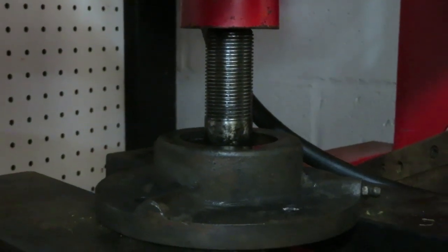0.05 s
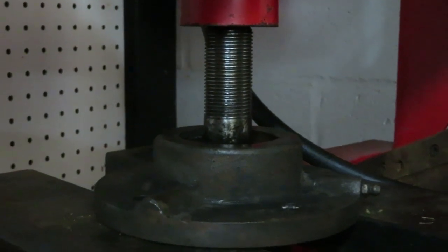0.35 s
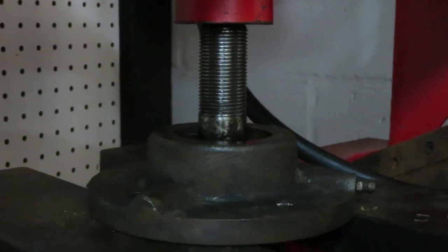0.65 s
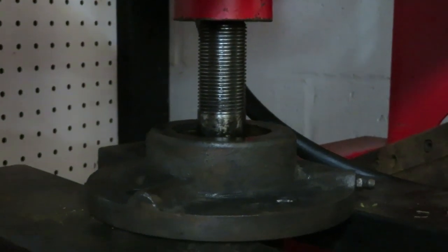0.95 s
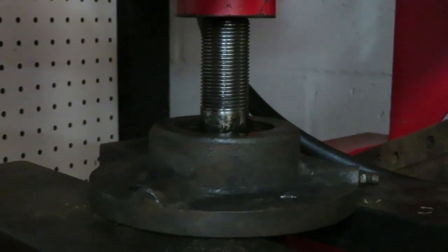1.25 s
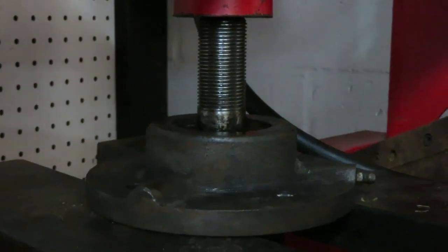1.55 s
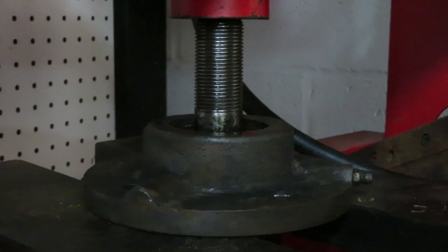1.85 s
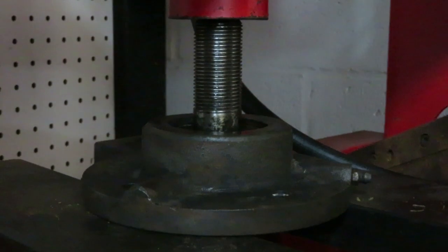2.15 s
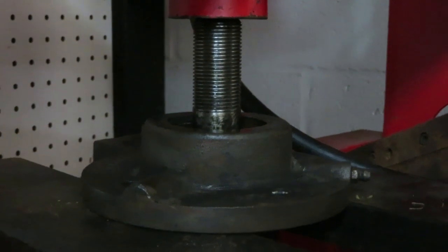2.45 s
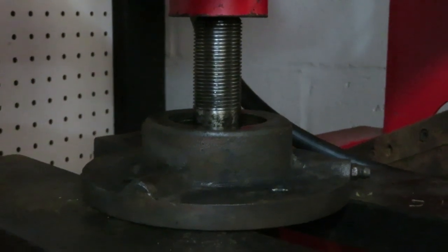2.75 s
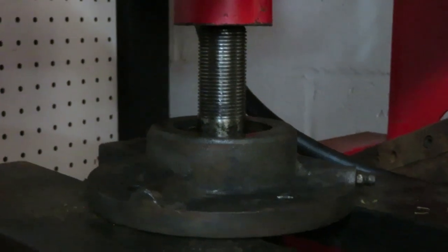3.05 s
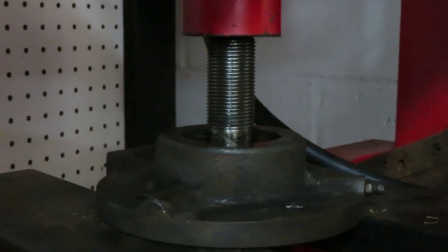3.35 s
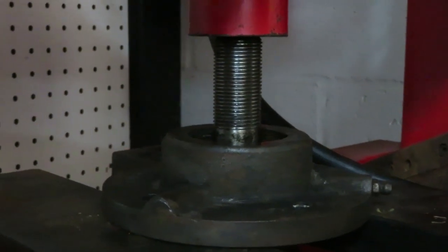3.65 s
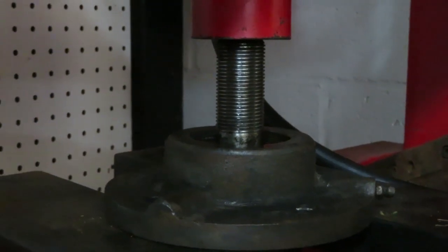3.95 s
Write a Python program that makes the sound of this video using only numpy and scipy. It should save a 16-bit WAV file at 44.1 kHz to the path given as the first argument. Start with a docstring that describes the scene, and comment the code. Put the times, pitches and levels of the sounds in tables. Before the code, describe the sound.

In a garage workshop, the air-powered pump of a hydraulic press sputters twice, stops for a moment, then runs in a fast, even chatter of hissing puffs and piston knocks, with a short room echo.

```python
"""An air-driven hydraulic pump works a shop press, twelve strokes a second, with one short pause. Each stroke
dumps a sharp puff of air through the muffler, followed by a brief second breath of air; the piston then knocks
against its stop, the check valve seats a moment later, and air hisses in for the next stroke. Heard on two
microphones in a garage: the bench close by gives quick reflections, the room a longer tail, and faint room air
lies underneath."""
import sys
import numpy as np
from scipy import signal
from scipy.fft import rfft, irfft
from scipy.io import wavfile
from scipy.ndimage import uniform_filter1d

SR = 44100
rng = np.random.default_rng(int(sys.argv[2]) if len(sys.argv) > 2 else 0)


def wav_out(sig):
    """Save sig, one row per channel (or a flat mono array), as 16-bit PCM at SR to the path in sys.argv[1]."""
    wavfile.write(sys.argv[1], SR, np.round(np.clip(np.atleast_2d(sig).T, -1, 1) * 32767).astype(np.int16))


N = 176400
T = np.arange(N) / SR
HZ = np.maximum(np.arange(N // 2 + 1) * SR / N, 1)

# pump strokes: t/s, puff/dB, extra treble (0.85 dB a unit), knock/dB, valve seating/dB
STROKES = [(0.025, -17.5, -1.0, -3, -13), (0.1236, -21, -3.3, -9.5, -27), (0.5799, -18.5, -0.5, -4, -9),
           (0.6621, -18.5, 0.5, -7.5, -7), (0.7445, -20.5, 2.3, -3, -14), (0.8274, -19, -1.4, -10, -17),
           (0.9088, -18, -3.2, -6.5, -12), (0.9907, -19.6, 0.4, -5, -22), (1.0726, -19.5, -0.8, -2, -11),
           (1.1542, -20.5, 1.0, -0.5, -2), (1.2366, -20.0, 0.5, -4.5, -14.5), (1.32, -22.5, 2.5, -5, -19),
           (1.407, -21.5, 0, -13, -9), (1.4988, -22, 2.3, -3, -17), (1.5844, -20.5, 1.2, -6, -5),
           (1.6672, -21, 1.8, -2.5, -11), (1.7502, -20.5, -0.6, -4, -18), (1.8329, -20, 0.7, -2, -8),
           (1.9157, -20.5, -0.3, -0.5, -8), (1.9994, -19.5, -0.5, -7, -17.5), (2.0829, -20.5, 0.5, -4, -19),
           (2.1658, -19, -0.5, -5.5, -16), (2.2494, -20.2, 0.8, -2, -11), (2.3339, -20, -0.3, -14, -11),
           (2.4186, -21.5, 1.5, -8.5, -11), (2.5022, -21, 1, -11, -22), (2.5865, -20.0, 1.6, -11, -17),
           (2.6697, -19, -0.5, -7.5, -16), (2.753, -21, 1.5, -6, -17), (2.837, -21, 1.5, -9, -14),
           (2.9199, -19.5, -1.5, -11, -17), (3.0039, -22, 1.3, -1, -6), (3.0868, -21, 1, -12, -18),
           (3.1711, -21, -1, -2, -13), (3.254, -21, 1.1, -2, 1), (3.3381, -22, 0.7, -2, -9),
           (3.421, -21, -1.5, -1, -2.5), (3.5059, -20.5, -3.7, -12, -14), (3.5889, -19.5, -2.5, -2, -1),
           (3.6727, -21, -0.0, -17, -20), (3.7553, -20, -1.8, -1.5, -4), (3.8387, -19, -3, -17, -13),
           (3.9209, -19, 0, -7, -8)]


def exhaust():
    """The valve snaps open and the cylinder empties through the muffler: a burst, then a slower drain."""
    # exhaust jet spectrum: f/Hz, level/dB
    jet_colour = [(100, -28.5), (300, -20), (700, -13), (1200, -9), (2000, -6.5), (2800, 0), (3600, -0.5),
                  (4500, -1), (5600, -4.5), (9000, -4.5), (11500, -8.5), (14500, -21), (16000, -28)]
    # muffler resonances: f/Hz, width/Hz, boost/dB
    muffler = [(1610, 136, 6), (1890, 140, 5), (2320, 37, 10), (2880, 150, 1.5), (3315, 42, 5),
               (3600, 170, 6.5), (8830, 180, 2.5)]
    attack_s, hold_s, fall_db_per_s = 0.0041, 0.0013, 1504.5
    drain_db, drain_db_per_s, drain_s = -9.5, 503, .03
    puff_db, rough_db, treble_hz = 2.5, 1.5, 5500
    jet = noise(jet_colour, muffler)
    turbulence = rms_one(uniform_filter1d(rng.standard_normal(N), size=24))
    jet *= from_db(rough_db * turbulence)
    treble = irfft(rfft(jet) / (1 + (treble_hz / HZ) ** 4), N)
    out = np.zeros(N)
    for start, db, extra_treble, _, _ in STROKES:
        span = slice(int(start * SR), int((start + .1) * SR))
        age = np.maximum(T[span] - start, 0)
        falling_s = np.maximum(age - attack_s - hold_s, 0)
        burst = from_db(-fall_db_per_s * falling_s)
        drain = from_db(drain_db - drain_db_per_s * falling_s) / (1 + (age / drain_s) ** 10)
        flow = np.minimum(age / attack_s, 1) ** 0.65 * np.hypot(burst, drain)
        bright = from_db(0.85 * extra_treble) - 1
        out[span] += from_db(db + puff_db) * flow * (jet[span] + bright * treble[span])
    return out


def thump():
    """The volume of each puff reaches the microphones as one push of pressure."""
    level_db, rise_s, hold_s, fall_s = -27.5, 0.0028, 0.0063, 0.0076
    corners = np.cumsum([0, rise_s, hold_s, fall_s])
    mean_puff_db = np.mean(np.array(STROKES)[:, 1])
    return sum(from_db(level_db + db - mean_puff_db) * np.interp(T, start + corners, [0, 1, 1, 0])
               for start, db, *_ in STROKES)


def piston():
    """The piston hits its stop and the check valve seats just after, ringing the pump body a little differently
    each time."""
    # pump body modes: f/Hz, level on the knock/dB, level on the valve seating/dB, t60/s
    body = [(132, -35, -28, 0.25), (171, -12, -19, 0.094), (236, -0.5, 0, 0.0074), (417, -12.5, -11, .05),
            (460, 5.5, -20, 0.01), (690, 9, -9, 0.0075), (1176, 1, 2.5, 0.031), (1370, -2.5, 2.5, 0.031),
            (1846, -6.5, -2.5, .03), (2170, -2.5, -18, 0.037), (4880, -2.5, -10.5, 0.023),
            (9720, -11, -16, 0.048), (13760, -18.5, -20, .05)]
    knock_delay_s, seat_delay_s, jitter_s = .0262, .032, .0007
    level_db, spread_db = -32, 1.5
    starts, _, _, knock_db, seat_db = np.transpose(STROKES)
    hits = np.append(starts + knock_delay_s, starts + seat_delay_s)
    hits += jitter_s * rng.standard_normal(len(hits))
    hit_samples = np.clip((hits * SR).astype(int), 0, N - 1)
    out = np.zeros(N)
    for k, (hz, on_knock, on_seat, t60) in enumerate(body):
        force_db = level_db + np.append(knock_db + on_knock, seat_db + on_seat)
        clicks = np.zeros(N)
        clicks[hit_samples] = from_db(force_db + spread_db * rng.standard_normal(len(hits)))
        out += (-1) ** k * ring(clicks, hz, t60)
    return out


def intake():
    """Supply air hisses through the valve, swelling before each puff, with a brief second breath of air just
    after it."""
    # air supply, shut off for the pause: t/s, level/dB
    supply = [(0, 0), (.03, -8), (.08, -5), (.13, -24), (.17, -50), (.495, -34.5), (.52, -7), (.57, -5.5),
              (4, -6)]
    # intake hiss spectrum: f/Hz, level/dB
    hiss_colour = [(100, -39), (250, -17.5), (500, -6.5), (1200, 1), (2700, 3), (4000, 0), (6000, -6.5),
                   (9500, -8.5), (12000, -14), (16000, -25)]
    # whistles of the air valve: f/Hz, width/Hz, boost/dB
    valve = [(2780, 150, -1), (8670, 260, 9), (9050, 250, -2)]
    level_db, fill_db, afterblow_db = -43.5, 8.5, 12
    starts = np.array(STROKES)[:, 0]
    starts = np.append(starts, starts[-1] + np.median(np.diff(starts)))  # air for one more stroke
    filling = fill_db * swells(starts - 0.0063, width_s=0.016)
    afterblow = afterblow_db * swells(starts + .022, width_s=0.0095)
    supply_db = np.interp(T, *np.transpose(supply))
    return from_db(level_db + supply_db + filling + afterblow) * noise(hiss_colour, valve)


def bench(sound):
    """The bench and press frame, close to the pump, throw back quick reflections."""
    # colour of the near reflections: f/Hz, level/dB
    colour = [(100, -12.5), (400, 4.5), (1000, -7.5), (2000, -9), (3600, -18.5), (8000, -13), (16000, -15)]
    return reflections(sound, colour, t60s=[(1, 0.12)], delay_s=0.003)


def garage(sound):
    """The room answers from farther off, with a tail that lasts longest in the bass."""
    # colour of the garage tail: f/Hz, level/dB
    colour = [(100, -1), (400, -4.5), (1200, -17), (2200, -21.5), (3600, -22), (8000, -18.5), (16000, -27)]
    # decay of the garage tail: f/Hz, t60/s
    t60s = [(100, 1), (1000, 0.81), (4000, 0.66), (8000, 0.58), (14000, .38)]
    return reflections(sound, colour, t60s, delay_s=0.035)


def background():
    """Faint still air of the garage, and a soft low swell that passes once."""
    # room air spectrum: f/Hz, level/dB
    air_colour = [(20, 5.5), (60, -1.5), (140, 0), (300, -15), (1000, -25), (4000, -28), (16000, -30.5)]
    # low swell spectrum: f/Hz, level/dB
    swell_colour = [(30, -14), (70, -1), (100, 0), (140, -9), (220, -26), (1000, -60)]
    air_db, swell_db, peak_s, width_s = -69.5, -51, 2.9, .14
    swell = from_db(swell_db) * np.exp(-((T - peak_s) / width_s) ** 2 / 2) * noise(swell_colour)
    return from_db(air_db) * noise(air_colour) + swell


def from_db(db):
    """Decibels to gain."""
    return 10 ** (np.asarray(db) / 20)


def rms_one(x):
    """Scale to unit rms."""
    return x / np.sqrt(np.mean(x ** 2) + 1e-20)


def at_hz(points, hz):
    """Read a table on a log-frequency axis."""
    f, value = np.transpose(points)
    return np.interp(np.log(hz), np.log(f), value)


def noise(spectrum, resonances=()):
    """Noise of unit rms with a broad colour and resonant peaks."""
    db = at_hz(spectrum, HZ)
    for hz, width, boost in resonances:
        db = db + boost / (1 + (2 * (HZ - hz) / width) ** 2)
    return rms_one(irfft(rfft(rng.standard_normal(N)) * from_db(db), N))


def ring(clicks, hz, t60):
    """A unit click sets a sine of height 1 ringing."""
    r, w = from_db(-60 / (t60 * SR)), 2 * np.pi * hz / SR
    return signal.lfilter([0, np.sin(w)], [1, -2 * r * np.cos(w), r * r], clicks + 1e-18)


def swells(times, width_s):
    """A bell-shaped rise and fall around each time."""
    return sum(np.exp(-np.minimum(((T - s) / width_s) ** 2, 20)) for s in times)


def reflections(x, colour, t60s, delay_s):
    """Dense echoes that fade in over the second half of the delay and die away band by band."""
    t = np.arange(SR) / SR
    hz = np.maximum(np.arange(SR // 2 + 1), 1)
    white, response = rfft(rng.standard_normal(SR)), 0
    onset = np.clip(2 * t / delay_s - 1, 0, 1)
    centres = np.geomspace(100, 16000, 9)
    for centre, share in zip(centres, np.eye(len(centres))):
        band_gain = np.interp(np.log(hz), np.log(centres), share)
        band = irfft(white * band_gain * from_db(at_hz(colour, hz)), SR)
        decay = from_db(-60 * t / at_hz(t60s, centre)) * onset
        response = response + band * decay / np.sqrt(np.sum(decay ** 2))
    return signal.fftconvolve(x, response)[:N]


def scene():
    """Air and piston reach both microphones alike; the left one loses more of the deep thump."""
    # microphone low cut on the thump: left f/Hz, right f/Hz
    low_cut_hz = [48, 12]
    air, knocks, push = exhaust() + intake(), piston(), thump()
    room = bench(air) + garage(air + knocks)
    low_cuts = [signal.butter(2, hz, "high", fs=SR, output="sos") for hz in low_cut_hz]
    bass = np.array([signal.sosfilt(low_cut, push) for low_cut in low_cuts])
    return air + knocks + room + background() + bass


def record(dry):
    """Both channels are cut steeply at the top."""
    cutoff_hz = 15800
    return signal.sosfilt(signal.ellip(10, .2, 70, cutoff_hz, fs=SR, output="sos"), dry)


dry = scene()
out = record(dry)
wav_out(out)
```